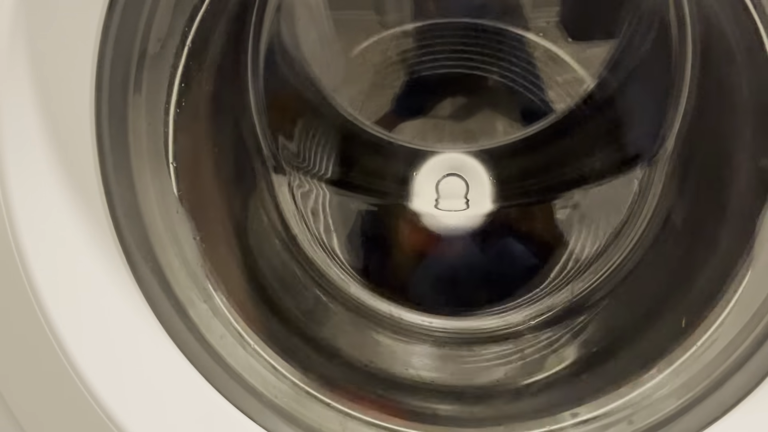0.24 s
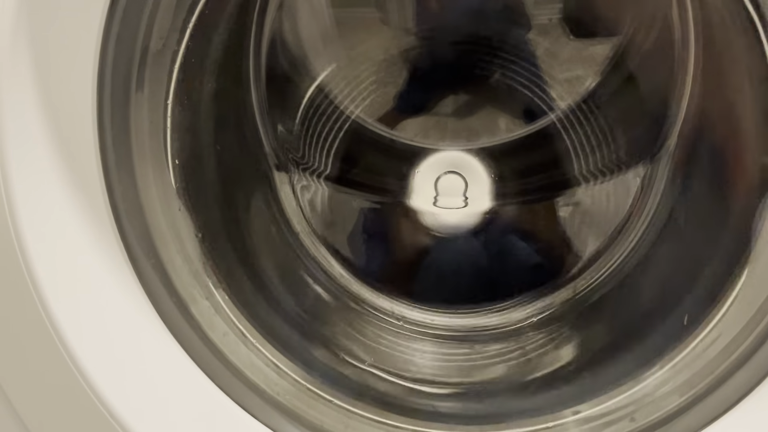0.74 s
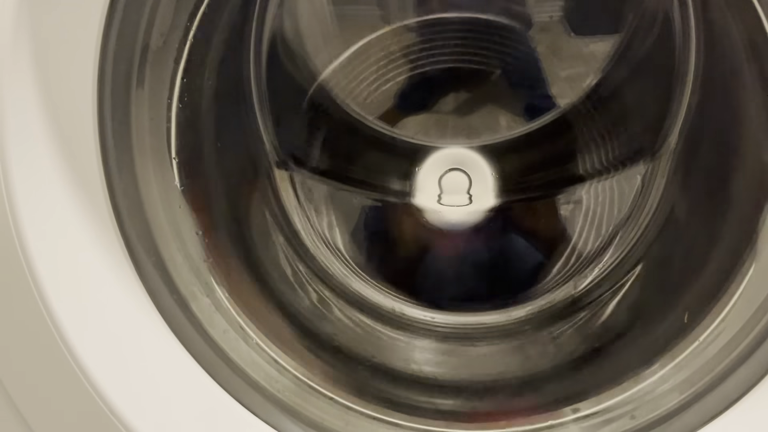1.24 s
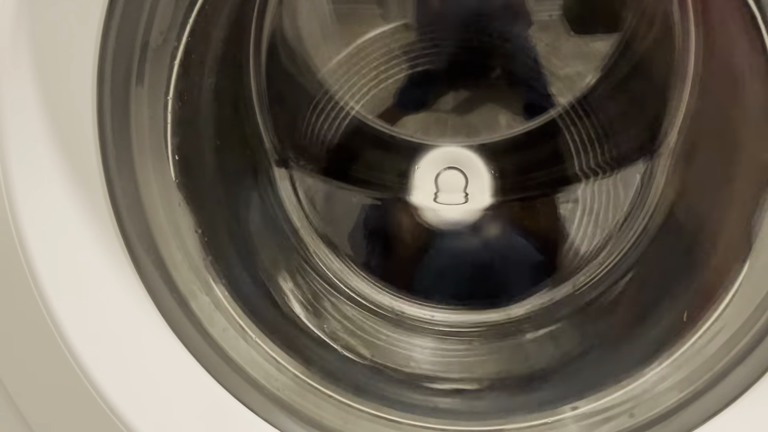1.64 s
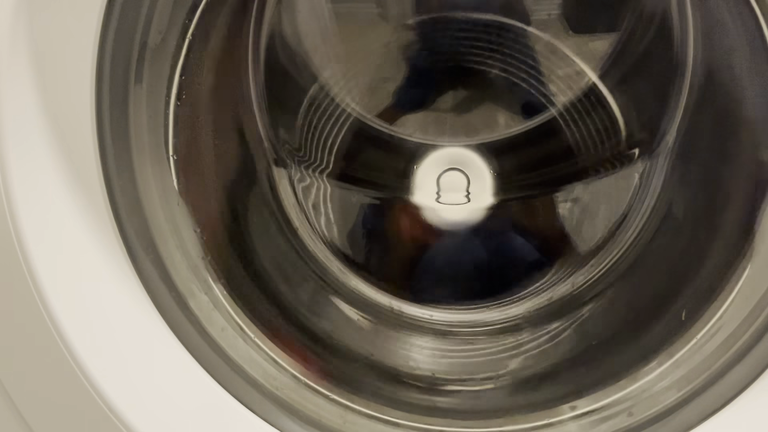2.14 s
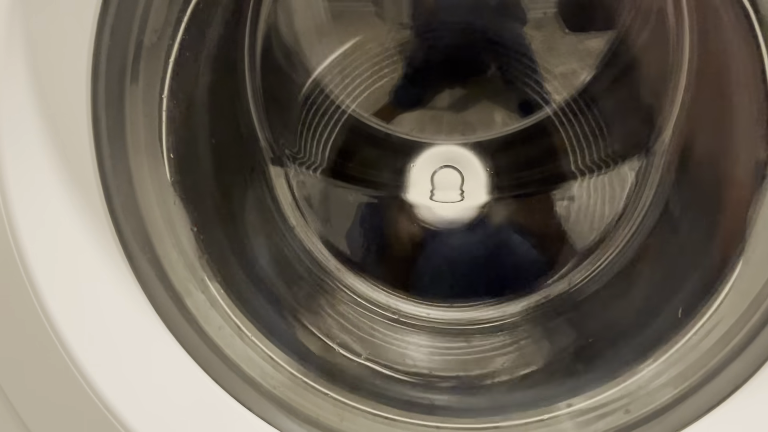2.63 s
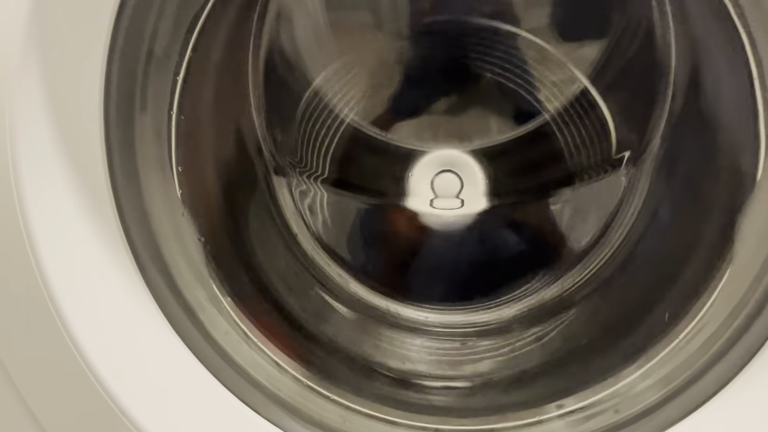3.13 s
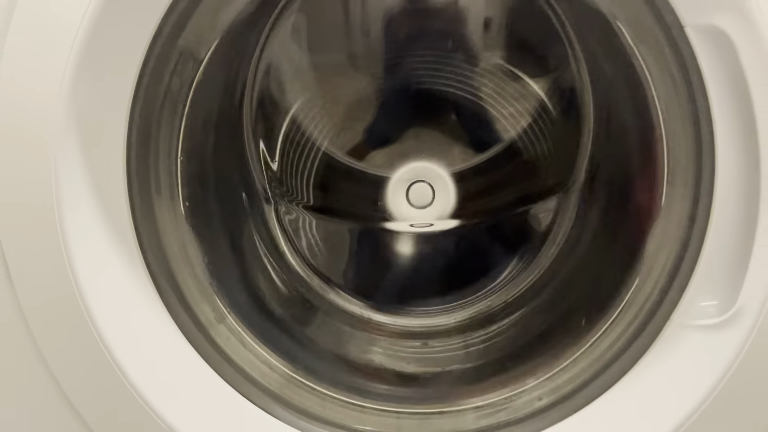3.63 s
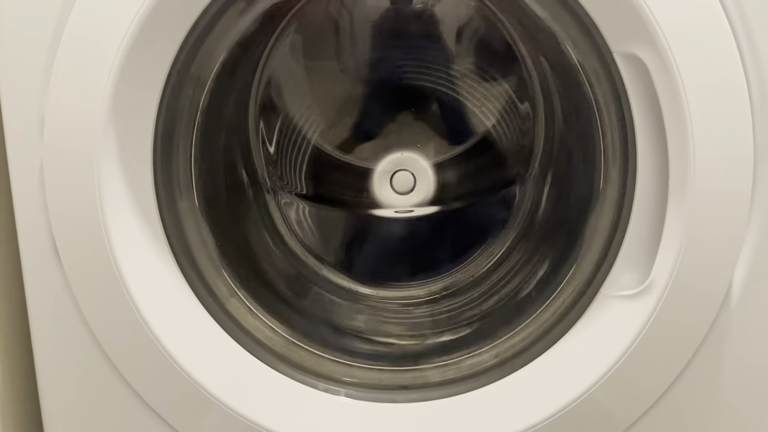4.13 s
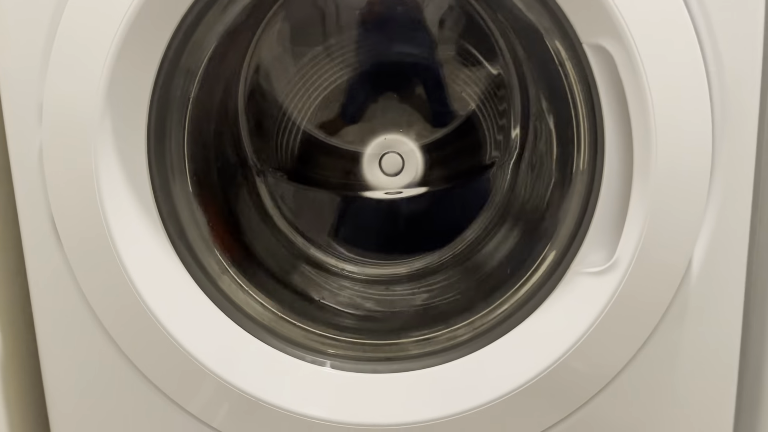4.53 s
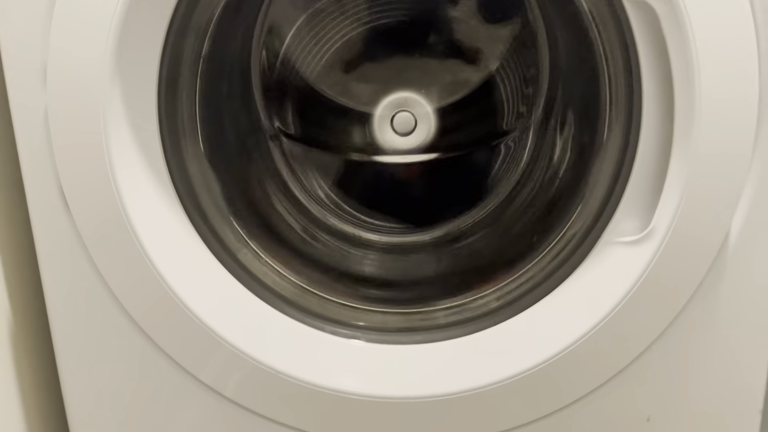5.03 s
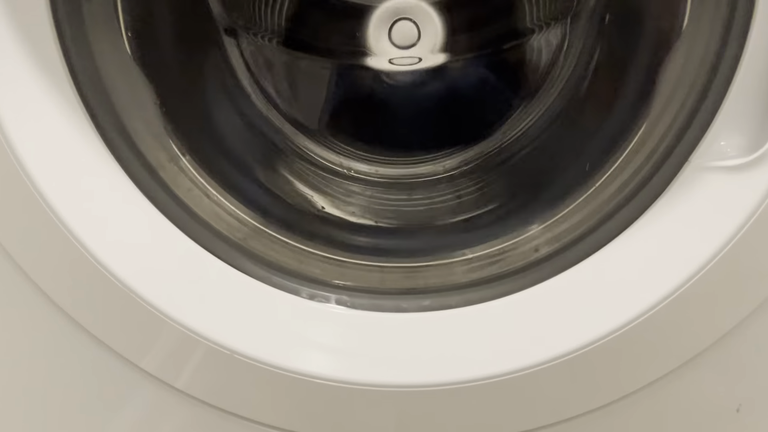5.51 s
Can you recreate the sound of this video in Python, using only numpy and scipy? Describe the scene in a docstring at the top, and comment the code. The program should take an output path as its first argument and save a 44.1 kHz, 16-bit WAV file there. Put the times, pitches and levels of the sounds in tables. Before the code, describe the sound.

A front-loading washing machine spins its load close up, low rumble throbbing about nine times a second while motor hum slowly climbs.

```python
"""A front-loading washing machine gathers speed at about nine turns a second, heard close to its door in a small room.
The lopsided load shakes the cabinet at multiples of the drum speed, and the motor hums and throbs once a turn.
Wet laundry rushes round as noise that swells each turn, with a hollow roar and a little spray flung at the tub.
A low pump hum and faint whines climb over it; half way through, the listener steps back.
Tones follow the drum's angle; the air, drops, scuffs and hiss are filtered noise."""
import sys
import numpy as np
from scipy import signal
from scipy.fft import rfft, irfft
from scipy.io import wavfile
from scipy.ndimage import uniform_filter1d

SR = 44100
rng = np.random.default_rng(int(sys.argv[2]) if len(sys.argv) > 2 else 0)


def store_pcm(level_fs):
    """Save levels as 16-bit WAV."""
    pcm = np.round(np.clip(level_fs, -1, 1) * 32767).astype(np.int16)
    wavfile.write(sys.argv[1], SR, np.atleast_2d(pcm).T)


N = 254456

START_TURNS_PER_S, GAIN_TURNS_PER_S2 = 8.807, 0.1342  # the drum gains speed evenly
POLES = 36  # motor poles passing in each turn of the drum

# How differently noise reaches the two microphones. Each row: pitch in Hz, side minus mid in dB.
WIDTH = [(60, -13), (150, -24), (230, -2.5), (370, -22), (460, 2.5), (600, -6.5), (850, -1), (1000, -2),
         (1250, 2), (1560, 4.5), (1800, -3.5), (4200, -2), (8000, 6.5)]


def undb(db):
    """Decibels to amplitude gain."""
    return 10 ** (np.asarray(db) / 20)


def curve(rows):
    """A time table, sample by sample."""
    return np.interp(np.arange(N) / SR, *np.transpose(rows))


def unit(x):
    """Scale to rms 1."""
    return x / np.sqrt(np.mean(x ** 2))


def walk(hz, size=16384):
    """Smooth random wandering that changes about hz times a second; rms 1."""
    f = np.arange(size // 2 + 1) * SR / N
    slow = irfft(rfft(rng.standard_normal(size)) * np.exp(-(f / hz) ** 2), size)
    return unit(np.interp(np.arange(N) * size / N, np.arange(size), slow))


def shape(x, points):
    """Filter by an outline of (Hz, dB), with a gentle fall above its last point."""
    hz, db = np.transpose(points)
    f = np.maximum(np.arange(N // 2 + 1) * SR / N, 1)
    outline_db = np.interp(np.log(f), np.log(hz), db)
    gain = undb(outline_db) / (1 + (f / (2 * hz[-1])) ** 2)
    return irfft(rfft(x) * gain, N)


def band(x, hz, width):
    """A resonance with steep skirts: the same peak filter passed twice."""
    b, a = signal.iirpeak(hz, hz / width, fs=SR)
    return signal.lfilter(b, a, signal.lfilter(b, a, x))


def band_noise(hz, width):
    """Noise through one resonance, at rms 1."""
    return unit(band(rng.standard_normal(N), hz, width))


def burst(start, attack_s, decay_s):
    """A quick rise and an exponential fall."""
    age = np.maximum(np.arange(N) / SR - start, 0)
    return (1 - np.exp(-age / attack_s)) * np.exp(-age / decay_s)


def ears(mid, side):
    """Left and right from their common and opposed parts."""
    return np.array([mid + side, mid - side])


def pan(x, db):
    """Make the left louder than the right by db."""
    return x * undb(np.reshape([db, -db], (2, -1)) / 2)


def tone(cycles, side_db):
    """A sine, its common part at rms 1, that reaches the two ears slightly out of step."""
    angle = 2 * np.pi * cycles
    return np.sqrt(2) * ears(np.cos(angle), undb(side_db) * np.sin(angle))


def room_noise(colour, ripple_db):
    """Coloured noise, rippled by the many fixed resonances of cabinet and room."""
    pair = []
    for _ in range(2):
        ripple = rng.standard_normal(N // 2 + 1)
        for _ in range(2):
            ripple = uniform_filter1d(ripple, size=130)  # smooth along frequency
        spectrum = rfft(rng.standard_normal(N)) * undb(ripple_db * unit(ripple))
        pair.append(unit(shape(irfft(spectrum, N), colour)))
    return ears(pair[0], shape(pair[1], WIDTH))


def resonance(hz, centre_hz, width_hz):
    """Gain of one resonance for a tone at hz; 1 at the centre."""
    return 1 / (1 + (2 * (hz - centre_hz) / width_hz) ** 2)


def response(hz, modes):
    """Gain of a set of resonances for a gliding tone; their powers add."""
    grid = np.linspace(hz.min(), hz.max(), 400)
    power = sum((undb(db) * resonance(grid, centre, width)) ** 2 for centre, width, db in modes)
    return np.interp(hz, grid, np.sqrt(power))


def loudness(law, speed, back, column):
    """Level of a noise in dB: speed, distance, and brief swells, as with the pump or a brush of handling."""
    # Each row: centre in seconds, time to fall to 1/e in seconds,
    # then the rise in dB of rumble and shudder, of rush, of spray, of fizz.
    swells = [(2.6, 0.54, 4, 2, 0, -0.5), (5.026, 0.38, 1, 1.5, 1, 0), (5.438, 0.091, 2, 2, 2, 2),
              (5.717, 0.33, 3.5, -0.5, 0.5, 2)]
    start_db, speed_db, back_db = law
    t = np.arange(N) / SR
    swell_db = sum(row[column] * np.exp(-((t - row[0]) / row[1]) ** 2) for row in swells)
    return start_db + speed_db * (speed - START_TURNS_PER_S) + back_db * back + swell_db


def cabinet(turn, speed, back, even_db=-2, scatter_back=0.23, waver_db=2.0, drift=0.085, back_db=2.0,
            side_db=-8):
    """Each turn the load bumps the cabinet; its multiples are delayed by pitch into a swish, mostly falling."""
    # Light panels answer first, the heavy tub last. Each row: pitch in Hz, delay in seconds.
    bump_delay = [(45, .054), (88, .052), (115, .038), (145, .032), (170, .014), (215, .015), (260, .027)]
    # Resonances the multiples slide through. Each row: centre in Hz, width in Hz, relative level in dB.
    cabinet_modes = [(26.8, 6.5, -63), (44.1, 4.8, -51.5), (67.5, 6, -51), (80.8, 8.9, -54),
                     (101.8, 15.6, -51), (129.3, 7, -53), (144, 8.3, -49), (158.8, 2.1, -53.5),
                     (170.4, 2.5, -53), (184, 11.2, -49.5), (213.2, 19, -53), (231, 7.8, -54),
                     (257, 9.1, -51.5), (280.7, 14, -54)]
    first_order, last_order, tub_orders = 3, 33, 16  # multiples of drum speed; the tub carries up to 16
    bump_turn = 0.8  # where in the turn the bump falls
    tub_scatter, bump_scatter = 0.16, 0.07  # smear of the bump, in cycles, at the door
    grid = np.arange(1, 400)
    late_cycles = np.cumsum(np.interp(grid, *np.transpose(bump_delay)))  # delay summed over 1 Hz steps
    out = 0
    for order in range(first_order, last_order + 1):
        hz = order * speed
        cycles = order * (turn - bump_turn) - np.interp(hz, grid, late_cycles)
        scatter = tub_scatter if order <= tub_orders else bump_scatter
        lag = (scatter + scatter_back * back) * rng.standard_normal() + drift * walk(0.79)
        # the tub's to and fro favours odd multiples
        db = even_db if order % 2 == 0 and order < tub_orders else 0
        gain = response(hz, cabinet_modes) * undb(db + back_db * back + waver_db * walk(2.2))
        spread_db = side_db + 20 * np.log10(order / POLES)  # long waves reach both ears alike
        out = out + gain * tone(cycles + lag, spread_db)
    return pan(out, -0.58)


def motor(turn, speed, back, direct_db=-49.0, pole_db=-46.0, upper_db=-44.0, second_db=-57, lower_db=-48,
          upper_turn=-0.078, upper_shift=0.2, lower_turn=0.52, lower_shift=-0.074):
    """Pole hum with sidebands from the lopsided load pulses once a turn, each tone gliding on a panel's resonance."""
    # Swells of two higher motor tones. Each row: time in seconds, level in dB of the lower, of the upper.
    tone_levels = [(0, -66, -57.5), (.5, -59.5, -57.5), (1.4, -64, -66), (2.2, -70, -59), (2.9, -70, -64),
                   (3.6, -57, -59), (4.4, -57, -55.5), (5, -58, -50), (5.25, -55, -53), (5.45, -51, -63),
                   (5.7, -50.5, -54)]
    # Those two tones, as multiples of the drum speed.
    tone_multiples = (48, 72)

    def panel(order):
        return resonance(order * speed, 344.7, 17.6)  # centre and width in Hz

    poles = POLES * turn + 0.012 * walk(4)
    upper_beat = turn - upper_turn - upper_shift * back
    lower_beat = turn - lower_turn - lower_shift * back
    hum = (undb(direct_db) + undb(pole_db) * panel(POLES + 0.05)) * tone(poles, -9.0)
    hum = hum + undb(upper_db) * panel(POLES + 1.8) * tone(poles + upper_beat, -42)
    hum = hum + undb(second_db) * panel(POLES + 3.1) * tone(poles + 2 * upper_beat, -9)
    hum = hum + undb(lower_db) * panel(POLES + 0.3) * tone(poles - lower_beat, -13)
    out = pan(hum * undb(0.85 * back), -3.5 + 3.8 * back)  # leans right at the door
    times, *levels = np.transpose(tone_levels)
    for multiple, db in zip(tone_multiples, levels):
        gain = undb(curve(np.column_stack([times, db])) + walk(36))
        out = out + gain * tone(multiple * turn + 0.04 * walk(6), -4)
    return out


def laundry(turn, speed, back, rumble_turn=0.19, shudder_turn=-0.012, rush_turn=0.23, rush_swing_db=1.0,
            spray_turn=0.38, spray_swing_db=0.5):
    """Each turn the load shudders the panels, rumbles the tub, drags air round and sheds an uneven spray."""
    # Levels: dB at the start by the door, dB per turn a second gained, dB more a full step back.
    rumble_level = (-55.5, 5, 2.5)
    shudder_level = (-54.5, 3.5, 1.5)
    rush_level = (-51.5, 1.5, 6.2)
    spray_level = (-62.5, 1.74, 3.5)
    # Colours of the four noises. Each row: pitch in Hz, relative level in dB.
    rumble_colour = [(15, -26), (30, -28), (45, -6), (75, 1), (110, 4.5), (150, 2), (190, -37)]
    shudder_colour = [(130, -20), (170, -4), (245, 0), (295, -10), (340, -6), (380, -2), (430, -5),
                      (500, -22)]
    rush_colour = [(300, -6), (380, -6), (450, -2), (520, -2), (600, -5.5), (680, -3), (760, -5.5),
                   (950, -8), (1130, -10), (1330, -14.5), (1620, -17), (2100, -23.5), (3500, -84)]
    spray_colour = [(1000, -51), (1800, 4), (2400, 2.5), (3200, 3), (4100, 0.5), (4500, 1), (5100, 0),
                    (6000, -7), (7200, -4.5), (9000, -51), (14000, -14)]

    def swing(peak_turn):
        return np.cos(2 * np.pi * (turn - peak_turn))

    depth_db = 4.5 * (1 - 0.64 * back)  # the throb is deepest at the door
    rumble_db = loudness(rumble_level, speed, back, column=2) + depth_db * swing(rumble_turn)
    rumble = room_noise(rumble_colour, ripple_db=1.0) * undb(rumble_db)

    shudder_db = loudness(shudder_level, speed, back, column=2) + depth_db * swing(shudder_turn)
    shudder = room_noise(shudder_colour, ripple_db=5.0) * undb(shudder_db)

    rush_db = loudness(rush_level, speed, back, column=3) + rush_swing_db * swing(rush_turn)
    flutter_db = 0.48 * (2.5 - back) * walk(25)
    rush = room_noise(rush_colour, ripple_db=2.56) * undb(rush_db + flutter_db)

    spray_db = loudness(spray_level, speed, back, column=4) + spray_swing_db * swing(spray_turn)
    patter_db = 0.5 * walk(15) + 0.86 * walk(180)
    spray = room_noise(spray_colour, ripple_db=2.37) * undb(spray_db + patter_db)
    return rumble + shudder + rush + pan(spray, 4.3)


def roar():
    """Rushing air fills resonances of the cabinet: a smooth, hollow roar that swells over the spin."""
    # Each row: centre in Hz, width in Hz, relative level in dB.
    roar_modes = [(372, 42, -53.5), (525, 54, -53.5), (605, 63, -53.5), (675.5, 49, -53.5), (786, 250, -61),
                  (1060, 150, -63.5), (1311, 200, -59.5), (1506, 290, -71.5)]
    # The swell. Each row: time in seconds, gain in dB.
    roar_level = [(0, -16.5), (2.8, -9), (4.1, -5), (4.55, -0.5), (4.72, -1), (4.88, 1), (5.01, 5),
                  (5.13, -.5), (5.3, 3), (5.55, -4), (5.77, 0.5)]
    mid = sum(undb(db) * band_noise(hz, width) for hz, width, db in roar_modes)
    side = sum(undb(db) * band_noise(hz, width) for hz, width, db in roar_modes)
    return undb(curve(roar_level)) * ears(mid, shape(side, WIDTH))


def seal(turn, back, brush_turn=0.7, depth_db=9, back_db=-8):
    """The door seal, brushed once a turn: a soft swish just ahead of each bump, mainly at the door."""
    hz, width_hz, peak_db = 505, 110, -52
    mid = band_noise(hz, width_hz)
    side = band_noise(hz, width_hz)
    db = peak_db + back_db * back + depth_db * (np.cos(2 * np.pi * (turn - brush_turn)) - 1)
    return undb(db) * ears(mid, 0.5 * side)


def pump(turn, waver_db=1.5, throb_db=0.7, flutter=0.045):
    """The drain pump's low, unsteady hum climbs, coming and going in the rumble."""
    # Each row: time in seconds, pitch in Hz.
    pump_pitch = [(2.3, 100.7), (2.56, 123.5), (2.9, 142.1), (3.3, 167), (3.73, 184), (4.4, 201),
                  (5, 217.1), (5.3, 224), (5.42, 232), (5.48, 259)]
    # Broken swells. Each row: time in seconds, level in dB.
    pump_level = [(2.3, -90), (2.49, -52), (2.56, -37), (2.68, -47), (2.77, -42.5), (2.83, -47),
                  (2.92, -39), (3, -51), (3.1, -41.5), (3.18, -50), (3.3, -39), (3.5, -44), (3.64, -35.5),
                  (3.9, -38), (3.96, -50), (4.02, -43), (4.1, -43), (4.18, -56), (4.87, -49), (5.02, -39.5),
                  (5.07, -43.5), (5.14, -37.5), (5.22, -46), (5.39, -37.5), (5.45, -46), (5.5, -42),
                  (5.6, -90)]
    cycles = np.cumsum(curve(pump_pitch)) / SR + flutter * walk(21)
    db = curve(pump_level) + waver_db * walk(32) + throb_db * np.cos(2 * np.pi * turn)
    return undb(db) * tone(cycles, -23.0)


def knocks(attack_share=0.48):
    """Dull scuffs, a tick and a soft low bump from handling: short bursts of resonant noise."""
    # Each row: start in seconds, level in dB before the burst's envelope, pitch in Hz, width in Hz,
    # decay in seconds.
    knock_rows = [(1.637, -41, 520, 53.6, 0.02), (2.295, -37, 620, 487, 0.041),
                  (5.409, -42, 800, 1280, 0.0041), (5.45, -35, 44.7, 25.4, 0.044)]
    out = 0
    for start, db, hz, width, decay_s in knock_rows:
        mid = band_noise(hz, width)
        side = band_noise(hz, width)
        envelope = burst(start, attack_share * decay_s, decay_s)
        out = out + undb(db) * ears(mid, shape(side, WIDTH)) * envelope
    return out


def splats(attack_s=0.0028, rim_delay_s=0.0043, rim_attack_s=0.009, rim_decay_s=0.027, grain_db=1.8,
           gain_db=2.5):
    """Each handful of drops patters on the tub and scrapes along its wall, then sizzles on the rim."""
    # Each row: start in seconds, relative level in dB, rim against tub in dB, scrape against tub in dB,
    # decay in seconds.
    splat_rows = [(0.232, -59, 3.5, 0, 0.017), (0.459, -61, 3.5, 3, .036), (0.609, -65.5, 8.5, -3, .02),
                  (0.683, -57, -12, -14, 0.031), (0.897, -65, -6, 4, .02), (0.944, -60, -9, -5, 0.035),
                  (1.13, -66.5, -7, 5, .075), (1.25, -67, 6, -3, 0.025), (1.477, -61, -10, -0.5, 0.037),
                  (1.945, -61.5, -3, 1, 0.025), (2.147, -68.5, 4, 0, .03), (2.457, -59.5, 2, -2, 0.043),
                  (2.892, -54.5, 1, -2, 0.038), (4.719, -55, -7, -11, .031)]
    # What tub and rim ring with. Each row: centre in Hz, width in Hz, relative level in dB.
    tub_modes = [(1480, 1270, -2), (2920, 500, -19)]
    rim_modes = [(4420, 300, -1), (4680, 500, -3), (4980, 400, -1)]
    # Each row: pitch in Hz, relative level in dB.
    scrape_colour = [(1200, -12), (2600, 2), (3600, 6.5), (5200, -1), (6800, -2), (7800, -43)]
    drops = rng.standard_normal((2, N)) * undb(grain_db * walk(490))
    tub = unit(sum(undb(db) * band(drops, hz, width) for hz, width, db in tub_modes))
    rim = unit(sum(undb(db) * band(drops, hz, width) for hz, width, db in rim_modes))
    scrape = unit(shape(drops, scrape_colour))
    out = 0
    for start, db, rim_db, scrape_db, decay_s in splat_rows:
        patter = (tub + undb(scrape_db) * scrape) * burst(start, attack_s, decay_s)
        sizzle = undb(rim_db) * rim * burst(start + rim_delay_s, rim_attack_s, rim_decay_s)
        out = out + undb(db + gain_db) * (patter + sizzle)
    return pan(ears(out[0], 0.71 * out[1]), 7.6)


def whine(turn, back, wander=0.2, waver_db=2.5, door_db=-9):
    """Thin, rough tones of belt and bearings climb with the drum, stronger away from the door."""
    # Each row: multiple of the drum speed, relative level in dB.
    whine_rows = [(112.7, -58.5), (122.5, -59), (139.5, -59), (147, -63)]
    out = 0
    for multiple, db in whine_rows:
        gain = undb(db + door_db * (1.5 - back) + waver_db * walk(8.8))
        out = out + gain * tone(multiple * turn + wander * walk(13.7), -1.4)
    return out


def fizz(speed, back, top_db=-69, loose_db=-13):
    """Faint top hiss, nearly the same in both ears but a little apart in time."""
    # Level: dB at the start by the door, dB per turn a second gained, dB more a full step back.
    fizz_level = (-65.5, 3.7, .4)
    # The finest hiss, then a thin steadier one above it. Each row: pitch in Hz, relative level in dB.
    fizz_colour = [(4000, -2.5), (6500, 7.5), (8000, -44), (9200, 10), (11000, 2.5), (13600, 1), (15500, 1)]
    top_colour = [(12500, -63), (13700, -10), (14200, 35), (14550, 31), (14800, -10), (15600, -28)]
    f = np.arange(N // 2 + 1) * SR / N
    lead_cycles = (f - 11900) / 7100  # the right ear leads by 1/7100 s, in step at 11900 Hz
    fizz_db = loudness(fizz_level, speed, back, column=5)
    out = 0
    for colour, db in (fizz_colour, fizz_db), (top_colour, top_db):
        common = rng.standard_normal(N)
        shifted = irfft(rfft(common) * np.exp(2j * np.pi * lead_cycles), N)
        pair = np.array([common, shifted]) + undb(loose_db) * rng.standard_normal((2, N))
        out = out + unit(shape(pair, colour)) * undb(db + 0.5 * walk(40))
    return out


def scene():
    """The drum's angle drives the machine's tones and throbs, and the listener's distance sets the balance."""
    # Each row: time in seconds, distance (0 at the door, 1 a full step back).
    step_back = [(0, 0.024), (2.5, 0.031), (4.2, 0.71), (5.77, 0.64)]
    speed = START_TURNS_PER_S + GAIN_TURNS_PER_S2 * np.arange(N) / SR
    turn = np.cumsum(speed) / SR
    back = np.clip(curve(step_back), 0, 1)
    # close to the door the machine throbs as the load swings past; beyond half a step this reverses
    throb_db = 1.0 * (0.5 - back)
    throb = undb(throb_db * np.cos(2 * np.pi * (turn + 0.023)))
    machine = throb * (cabinet(turn, speed, back) + motor(turn, speed, back))
    water_and_air = laundry(turn, speed, back) + roar() + seal(turn, back) + splats()
    return machine + water_and_air + pump(turn) + knocks() + whine(turn, back) + fizz(speed, back)


def record(dry):
    """The microphone's signal opens softly over 4 ms and is cut steeply above 15 kHz."""
    opening = np.minimum(np.arange(N) / SR / 0.004, 1)
    top_cut = signal.ellip(8, 0.2, 70, 15000, fs=SR, output="sos")
    return signal.sosfilt(top_cut, opening * dry)


dry = scene()
out = record(dry)
store_pcm(out)
```